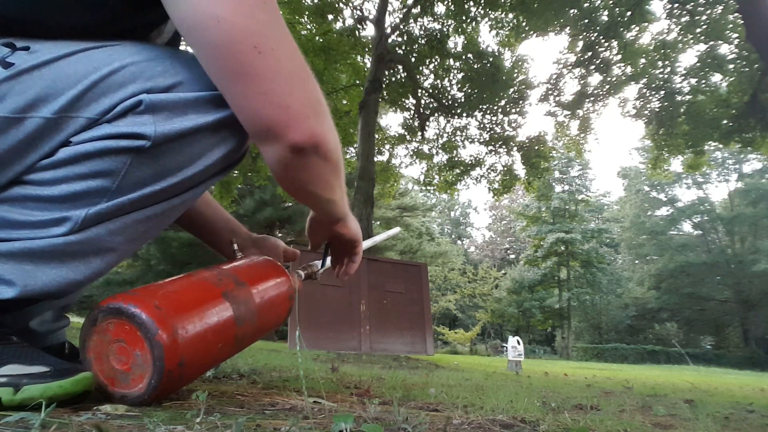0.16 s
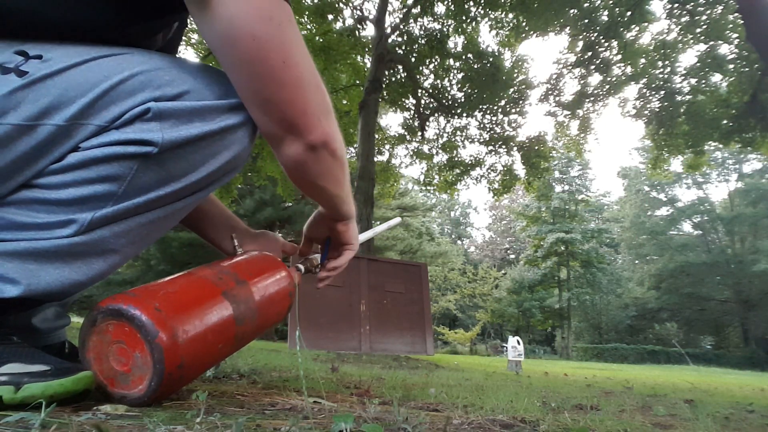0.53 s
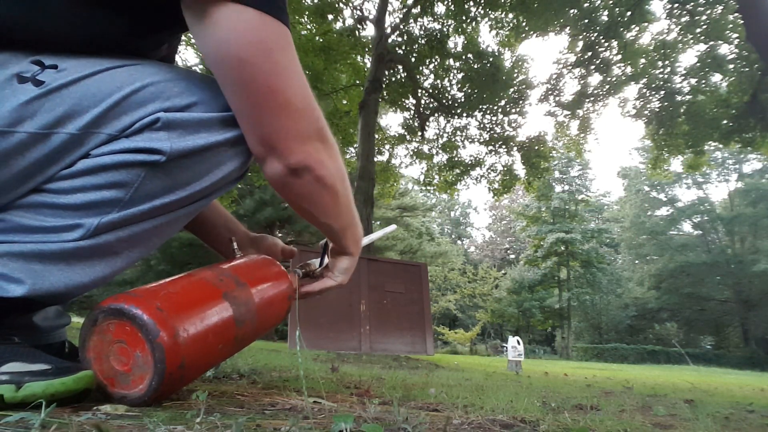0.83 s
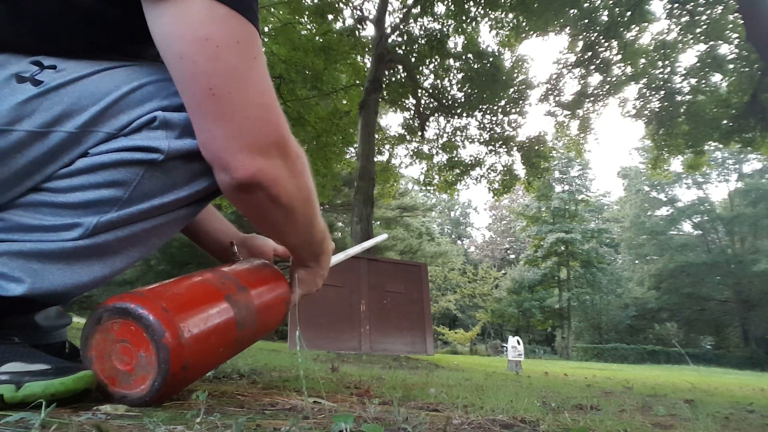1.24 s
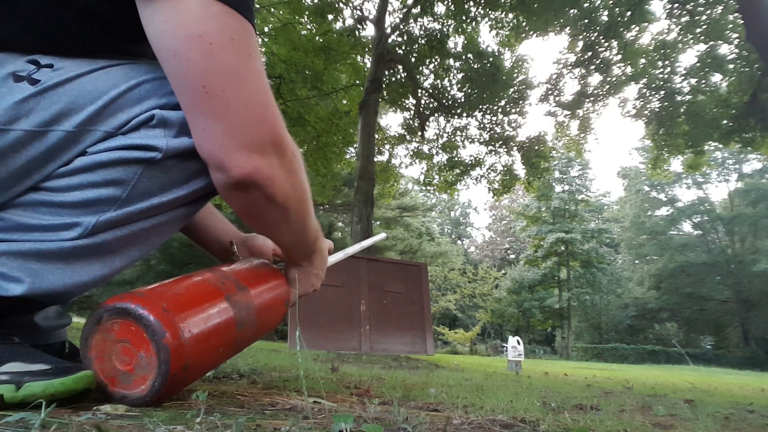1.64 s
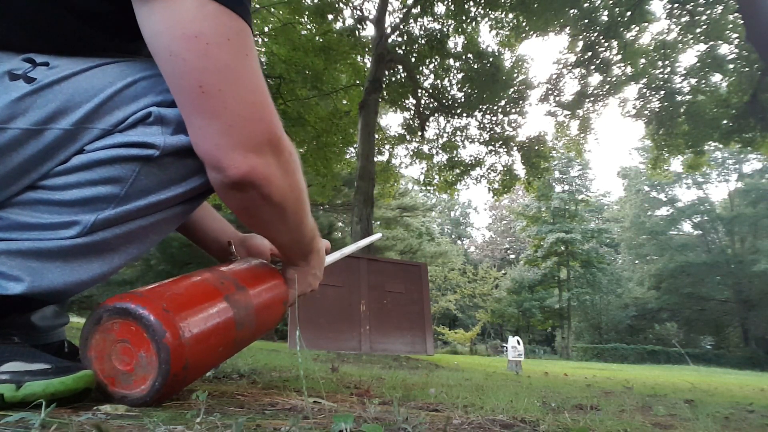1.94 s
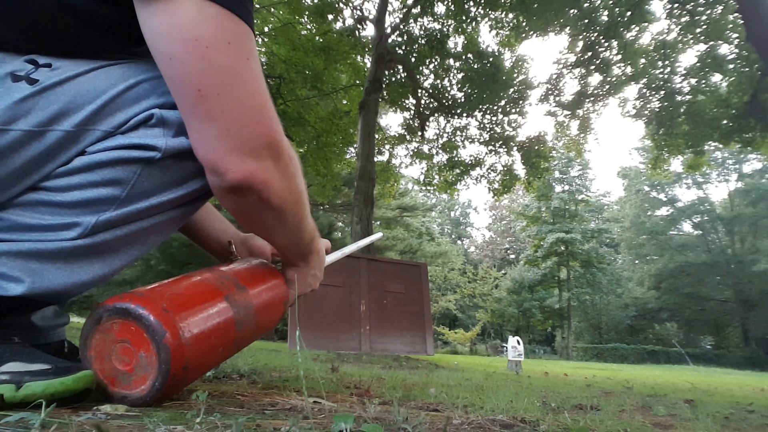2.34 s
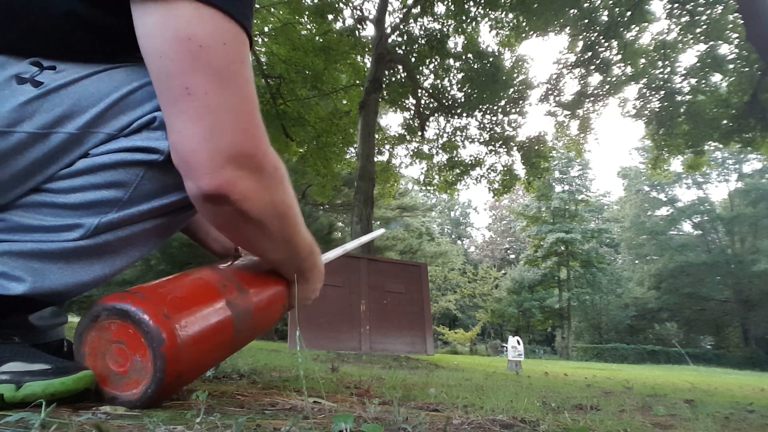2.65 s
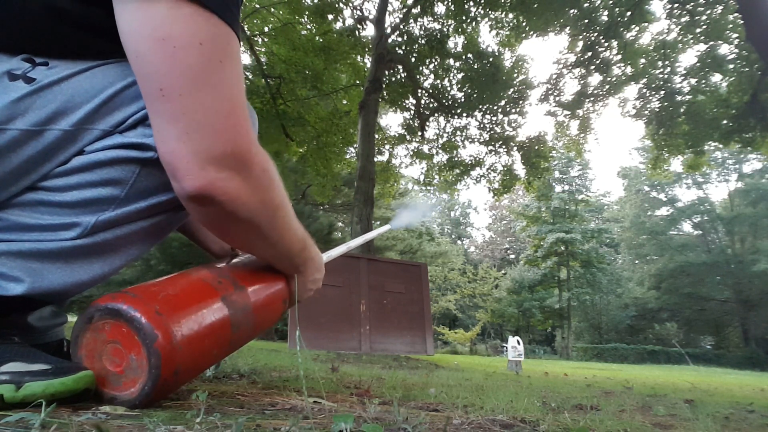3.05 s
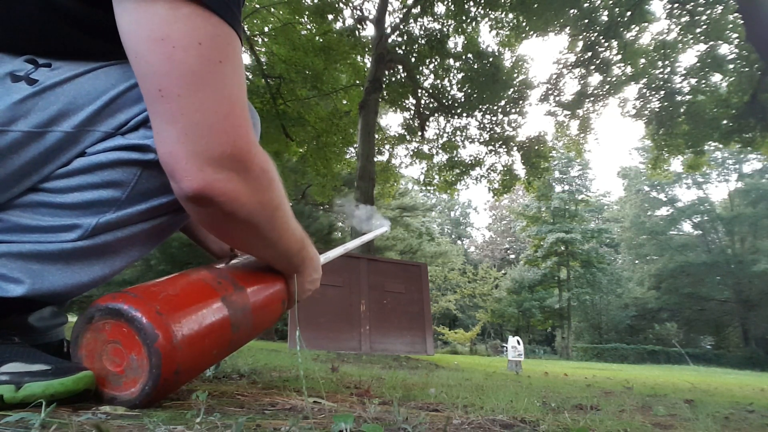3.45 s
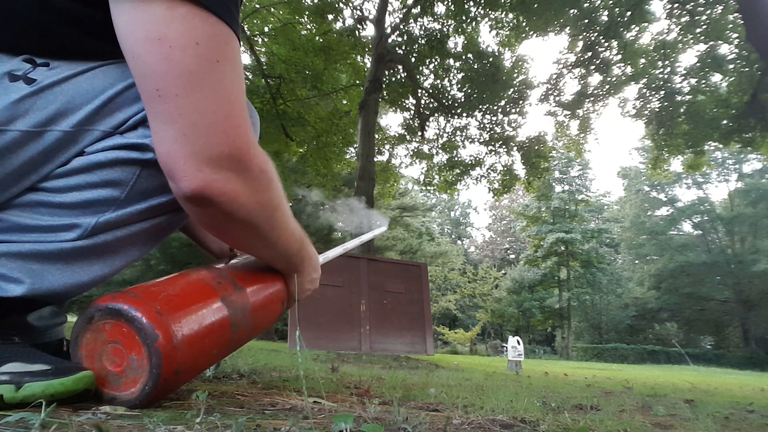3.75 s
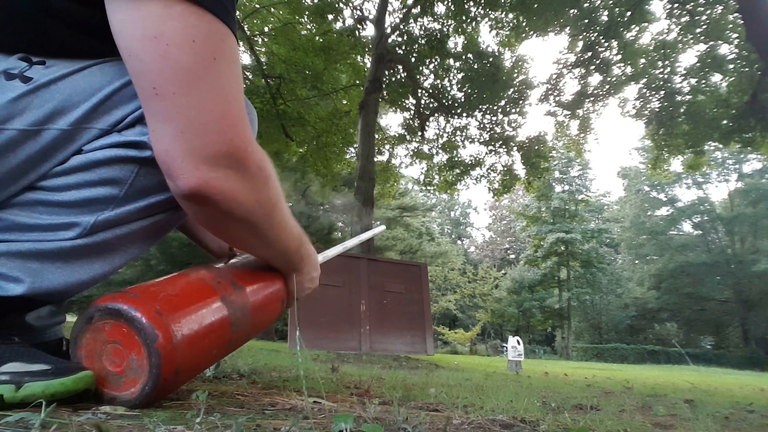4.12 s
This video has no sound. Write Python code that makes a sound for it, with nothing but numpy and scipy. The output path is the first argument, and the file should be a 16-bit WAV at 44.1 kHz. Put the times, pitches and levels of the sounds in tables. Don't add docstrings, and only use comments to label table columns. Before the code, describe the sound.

Outdoors on a lawn, faint traffic hum, hiss and chirping crickets lie under small taps, rubs and scrapes of hands on a metal tank. A valve clicks, a very brief hiss leaks, then a deafening crack bursts close to the stereo microphone, overloading it. A bright roaring, whistling air jet drains within about half a second, leaving a low roll, tree echoes and slowly returning crickets.

```python
import sys
import numpy as np
from scipy import signal
from scipy.io import wavfile
from scipy.ndimage import uniform_filter1d

SR = 44100
rng = np.random.default_rng(int(sys.argv[2]) if len(sys.argv) > 2 else 0)


def ratio_of_db(decibels):
    return 10 ** (np.asarray(decibels, float) / 20)


def file_out(sig):
    cols = np.atleast_2d(sig).T
    lim = np.clip(cols, -1, 1)
    pcm = np.round(lim * 32767).astype(np.int16)
    wavfile.write(sys.argv[1], SR, pcm)


N = 189008

# (frequency [Hz], level per Hz [dB])
AIR_COLOUR = [(25, -20), (60, -10), (86, -1), (118, 1), (184, -7), (320, -14), (1100, -25.5), (2120, -32),
              (5100, -48.5), (6000, -44), (8400, -48), (9970, -56), (14800, -48), (16000, -48)]
# (frequency [Hz], likeness [-1..1])
AIR_LIKENESS = [(40, .85), (130, .85), (290, .7), (640, .16), (1410, -.15), (3100, .04), (15000, 0)]
# (frequency [Hz], left minus right [dB])
AIR_BALANCE = [(60, -0.5), (180, 0.5), (550, 0), (1650, 1.5), (4970, -1.0), (15000, 0)]
# (frequency [Hz], width [Hz], level [dB])
MACHINE_HUM = (1185, 10, -70)
# (frequency [Hz], width [Hz], level [dB])
CHORUS = [(6540, 200, -73), (6800, 260, -73), (7700, 500, -79)]
LOW_CRICKET = (6310, 0, -69.3, 42, .155, 1)
LOW_CHIRPS = [.11, .395, .69, .99, 1.31, 1.62, 1.9, 2.215, 2.51, 3.57, 3.87, 4.17]
HIGH_CRICKET = (6860, 0, -68.8, 39, .23, -1)
HIGH_CHIRPS = [.12, .46, .78, 1.07, 1.36, 1.7, 2.05, 2.36, 3.45, 3.7, 4.04]
FIELD_CRICKET = (4200, 450, -79, 15, .48, -2)
FIELD_CHIRPS = [-.27, .53, 1.2, 1.77, 3.2, 3.9]
# (time [s], level [dB], frequency [Hz], width [Hz], length [s])
RUSTLES = [
    (.09, -71, 4600, 150, .04),
    (.785, -62, 3000, 6000, .022),
    (.8, -62, 1100, 1100, .4),
    (.83, -66, 3800, 300, .02),
    (1.04, -65, 5500, 7000, .1),
    (1.24, -64.5, 3600, 500, .13),
    (1.62, -70, 4000, 900, .02),
    (2.288, -60, 4000, 1600, .014),
    (2.297, -65, 3750, 500, .05),
    (2.55, -71, 4200, 900, .02),
]
# (frequency [Hz], time to fall 60 dB [s])
TREE_FADE = [(300, .9), (1500, 1.1), (3500, 1.6), (6000, .85), (9000, .9), (11000, .9), (15000, .7)]
# (frequency [Hz], width [Hz], level [dB], time to fall 60 dB [s])
RUMBLE = (330, 480, -30.5, .95)
# (time [s], peak [dB], length [ms], port ring [dB])
SHOCKS = [
    (2.64873, 0, .28, -12),
    (2.6495, -30, .3, -10),
    (2.6503, -22, .3, -6),
    (2.6509, -11, .22, -22),
    (2.6519, -14, .25, -7),
    (2.6527, -22, .3, -11),
    (2.6560, -22, .3, -22),
    (2.6890, -19, .6, -30),
]
# (frequency [Hz], level [dB], time to fall 60 dB [s])
THUMP = [
    (95, -26, .06),
    (150, -27, .2),
    (360, -15, .045),
]
# (start [s], end [s], first pitch [Hz], last pitch [Hz], level [dB])
RUN_UP = (2.6450, 2.6482, 700, 2600, -20)
# (frequency [Hz], level per Hz [dB])
FULL_JET = [(60, -48), (110, -22), (300, -20), (570, -17), (800, -10), (1100, -14), (1950, -13.5),
            (3500, -18), (5500, -11), (7800, -4), (10500, -12), (16000, -12)]
LOW_JET = [(60, -60), (100, -34), (330, -33), (500, -26), (800, -11), (1600, -5.5), (2900, -6),
           (4400, -3.5), (6000, -2), (8800, -3), (10500, -11), (16000, -20)]
EMPTY_JET = [(180, -42.5), (400, -20), (700, -4), (1000, 1), (1350, -11), (1700, 1), (2200, -5), (3600, -3),
             (4400, -9), (8800, -17), (16000, -36)]
# (frequency [Hz], likeness [-1..1], left minus right [dB])
JET_PORTS = [(300, .72, 1.5), (1700, .88, 1), (2500, .75, 0), (3300, .05, -3), (4000, -.05, -2),
             (5200, .53, 2.5), (7500, .86, 0.5), (9300, .6, 5), (10000, -.2, -2.5), (11200, -.6, -3),
             (12300, -.1, 3.5), (13500, .2, 7.5), (15500, .55, 1)]
# (time [s], jet level [dB], drained [0 full, 1 low, 2 empty])
TANK = [
    (2.7, -13.3, .05),
    (2.8, -14.8, .15),
    (2.93, -16.7, .7),
    (3.06, -20.6, .95),
    (3.12, -29, 1.25),
    (3.2, -44, 1.8),
    (3.25, -59, 1.9),
]
# (start [s], end [s], first pitch [Hz], last pitch [Hz], share of the jet [dB])
WHISTLES = [
    (2.652, 2.895, 8050, 7450, -5),
    (2.97, 3.095, 6200, 5800, -10.5),
]
# (frequency [Hz], width [Hz], level [dB])
BARREL = [(730, 45, -8), (930, 45, -6), (1110, 45, -8), (1690, 45, -3), (1900, 50, -12)]
# (frequency [Hz], level [dB])
BODY = [(3800, 0), (4100, -3), (4450, 1), (4800, 0), (8300, 0), (9050, 6), (9350, 2), (9700, -2),
        (10600, 0), (11800, 1), (12350, 5), (12800, 0), (14800, 0), (15500, 4)]

SHOT_S = 2.6487
TIME = np.arange(N) / SR


def evened(x):
    return x / np.sqrt(np.mean(x ** 2) + 1e-20)


def read(points, hz, axis=1):
    table = np.array(points)
    return np.interp(np.log(hz + 1), np.log(table[:, 0] + 1), table[:, axis])


def over_time(rows):
    s, *columns = np.transpose(rows)
    return [np.interp(TIME, s, column) for column in columns]


def resonate(x, hz, width):
    r = np.exp(-np.pi * width / SR)
    if np.ndim(hz) == 0:
        pole = r * np.exp(2j * np.pi * hz / SR)
        return 2 * signal.lfilter([1 - r], [1, -pole], x + 1e-18).real
    turn = np.exp(2j * np.pi * np.cumsum(hz) / SR)
    return 2 * (turn * signal.lfilter([1 - r], [1, -r], x / turn + 1e-18)).real


def resonate_twice(x, hz, width):
    return evened(resonate(resonate(x, hz, width), hz, width))


def noise(colour, likeness, balance, size, patch_db):
    hz = np.fft.rfftfreq(size, 1 / SR)
    a, b, c, d, patches = rng.standard_normal((4 * N // size + 5, len(hz), 5)).T
    patches = uniform_filter1d(patches, size=10, axis=0)
    patches = evened(uniform_filter1d(patches, size=10, axis=1))
    alike = np.clip(likeness(hz), -1, 1)[:, None]
    side = ratio_of_db(balance(hz)[:, None] / 2)
    left = a + 1j * b
    right = alike * left + np.sqrt(1 - alike ** 2) * (c + 1j * d)
    spectra = np.array([left * side, right / side])
    spectra *= ratio_of_db(read(colour, hz)[:, None] + patch_db * patches)
    return evened(signal.istft(spectra, nperseg=size, noverlap=size - size // 4)[1][:, :N])


def air():
    out = ratio_of_db(-42) * noise(AIR_COLOUR, lambda hz: read(AIR_LIKENESS, hz), lambda hz: read(AIR_BALANCE, hz),
                           size=2048, patch_db=0.6263)
    for hz, width, db in [MACHINE_HUM] + CHORUS:
        out += ratio_of_db(db) * resonate_twice(rng.standard_normal((2, N)), hz, width)
    return out


def cricket(insect, starts):
    hz, rise_hz, db, rate, length, side_db = insect
    stroke, gate, along = np.zeros(N), np.zeros(N), np.zeros(N)
    for s in starts:
        on = (TIME >= s) & (TIME < s + length)
        stroke += on * ((TIME - s) * rate % 1)
        along += on * (TIME - s) / length
        gate += on
    pitch = hz + 130 * (stroke - .5) + rise_hz * np.tanh(1.8 * along)
    swell = np.sin(np.pi * along ** (1 + rise_hz / 800)) ** (.35 + rise_hz / 900)
    strokes = .7 + np.sin(np.pi * np.minimum(stroke / .85, 1))
    blurred = resonate(resonate(rng.standard_normal((2, N)), pitch, 110), pitch, 110)
    heard = gate * swell * strokes * blurred
    heard /= np.sqrt(np.mean(heard[:, gate > 0] ** 2, axis=1, keepdims=True))
    return ratio_of_db(db) * ratio_of_db(side_db / 2 * np.array([[1], [-1]])) * heard


def hands():
    out = np.zeros((2, N))
    grit = rng.standard_normal((2, N))
    grit = grit * ratio_of_db(3.0 * evened(uniform_filter1d(rng.standard_normal(N), size=120)))
    for s, db, hz, width, length in RUSTLES:
        u = np.clip((TIME - s) / length, 0, 20)
        out += ratio_of_db(db) * resonate_twice(grit, hz, width) * np.tanh(8 * u) * np.exp(-u ** 2)
    return out


def ducking():
    lawn_db, duck_db = 1.4, -10.5
    fall_s, release_s, recover_s = .07, 3.25, .15
    fallen = 1 - np.exp(-np.maximum(TIME - SHOT_S, 0) / fall_s)
    recovery = 1 + np.maximum(TIME - release_s, 0) / recover_s
    return ratio_of_db(lawn_db + duck_db * fallen / recovery)


def trees(x):
    taps = np.zeros((2, SR))
    at = np.arange(900, SR - 20, 20) + rng.integers(0, 20, (2, (SR - 901) // 20))
    np.put_along_axis(taps, at, rng.choice([-1., 1.], at.shape), 1)
    hz, t, z = signal.stft(taps, SR, nperseg=256)
    fade = ratio_of_db(-60 * t / read(TREE_FADE, hz)[:, None])
    tail = signal.istft(z * fade, SR, nperseg=256)[1]
    return signal.fftconvolve(x, tail / np.linalg.norm(tail[0]), axes=1)[:, :N]


def rumble():
    hz, width, db, t60 = RUMBLE
    since = TIME - SHOCKS[0][0]
    shared, separate = rng.standard_normal(N), rng.standard_normal((2, N))
    roll = resonate_twice(shared + .7 * separate, hz, width)
    return (since > 0) * ratio_of_db(db - 60 * np.maximum(since, 0) / t60) * roll


def plug_run_up():
    start, end, low_hz, high_hz, db = RUN_UP
    along = np.clip((TIME - start) / (end - start), 0, 1)
    hz = low_hz + (high_hz - low_hz) * along
    return ratio_of_db(db) * along * (along < 1) * np.sin(2 * np.pi * np.cumsum(hz) / SR)


def shock():
    ring_hz, ring_width_hz = 7200, 900
    push, kicks = np.zeros(N), np.zeros(N)
    for s, db, ms, ring_db in SHOCKS:
        u = np.clip((TIME - s) / (ms / 1000), -5, 40)
        front = .5 + .5 * np.tanh(u / .08)
        push += ratio_of_db(db) * front * np.tanh(6.0 * (1 - u)) * np.exp(-.12 * u ** 3 * (u > 0))
        kick = np.exp(-((TIME - s) / .0004) ** 2)
        kicks += ratio_of_db(ring_db) * kick * np.sin(2 * np.pi * ring_hz * TIME)
    since = np.maximum(TIME - SHOCKS[0][0], 0)
    for hz, db, t60 in THUMP:
        push += ratio_of_db(db - 60 * since / t60) * np.sin(2 * np.pi * hz * since)
    port_ring = 1.3 * resonate(kicks, ring_hz, ring_width_hz) * ratio_of_db(np.array([[1.5], [-1.5]]))
    return push + plug_run_up() + port_ring


def tank_pressure():
    valve_s, leak_db, leak_rise_s, leak_drained = 2.619, -38, .012, 1.5
    burst_db, burst_s = -13.5, .0058
    lull_db, refill_s, lull_drained = -7, .006, .25
    level_db, drained = over_time(TANK)
    refill = np.exp(-np.maximum(TIME - SHOT_S - burst_s, 0) / refill_s)
    level_db = np.where(TIME < SHOT_S + burst_s, burst_db, level_db + lull_db * refill)
    leak = ratio_of_db(leak_db) * np.clip((TIME - valve_s) / leak_rise_s, 0, 1) ** 2
    level = np.where(TIME < SHOT_S, leak, ratio_of_db(level_db) * (TIME < TANK[-1][0]))
    drained = np.where(TIME < SHOT_S, leak_drained, drained + lull_drained * refill)
    return uniform_filter1d(level, size=30), drained


def crackle(drained):
    kicks_per_s, kick_db, fade_s = 350, -4, .0009
    chance, size = rng.random(N), np.minimum(rng.exponential(1, N), 2)
    hits = size * (chance < kicks_per_s / SR)
    kicks = signal.lfilter([1], [1, -np.exp(-1 / (fade_s * SR))], hits)
    return evened(1 + ratio_of_db(kick_db) * kicks * np.clip(1 - drained, 0, 1))


def whistle(flow):
    width_hz, edge_s = 1050, .012
    out = 0
    wander = 1 + .012 * evened(uniform_filter1d(rng.standard_normal(N), size=500))
    for start, end, from_hz, to_hz, db in WHISTLES:
        along = np.clip((TIME - start) / (end - start), 0, 1)
        hz = wander * (from_hz + (to_hz - from_hz) * along ** 2)
        on = (np.tanh((TIME - start) / edge_s) - np.tanh((TIME - end) / edge_s)) / 2
        out = out + ratio_of_db(db) * on * resonate_twice(flow, hz, width_hz)
    return out


def barrel_ring(flow, drained):
    sings_from = .9
    pipe = sum(ratio_of_db(db) * evened(resonate(flow, hz, width)) for hz, width, db in BARREL)
    return ratio_of_db(-10) * np.clip(drained - sings_from, 0, 1) * (TIME > SHOT_S) * pipe


def microphone_body(x):
    hz = np.linspace(0, SR / 2, 257)
    taps = signal.firwin2(255, hz, ratio_of_db(read(BODY, hz)), fs=SR)
    return signal.oaconvolve(x, taps[None], "same")


def jet():
    level, drained = tank_pressure()
    full, low, empty = (noise(colour, lambda hz: read(JET_PORTS, hz), lambda hz: read(JET_PORTS, hz, axis=2),
                              size=512, patch_db=1.5) for colour in (FULL_JET, LOW_JET, EMPTY_JET))
    shares = [np.sqrt(np.clip(1 - abs(drained - k), 0, 1)) for k in range(3)]
    roar = shares[0] * full + shares[1] * low + shares[2] * empty
    roar = roar + barrel_ring(empty, drained)
    eddies_db = .8 * evened(uniform_filter1d(rng.standard_normal(N), size=70))
    strength = ratio_of_db(-2) * level * ratio_of_db(eddies_db) * crackle(drained)
    return microphone_body(strength * (roar + whistle(low)))


def scene():
    blast = jet() + shock() + rumble()
    insects = cricket(LOW_CRICKET, LOW_CHIRPS) + cricket(HIGH_CRICKET, HIGH_CHIRPS)
    insects = insects + cricket(FIELD_CRICKET, FIELD_CHIRPS)
    lawn = air() + insects + hands()
    return blast + ratio_of_db(-25) * trees(blast) + ducking() * lawn


def roll_off(x):
    return signal.sosfilt(signal.butter(12, 16630, fs=SR, output="sos"), x)


def record(dry):
    bass_cut_hz, treble_cut_hz = 42, 15850
    thinned = signal.lfilter(*signal.butter(2, bass_cut_hz, "high", fs=SR), dry)
    overloaded = np.clip(thinned, -.86, .86)
    edge = signal.firwin(1023, treble_cut_hz, window=("kaiser", 9), fs=SR)
    return roll_off(signal.oaconvolve(overloaded, edge[None], "same"))


dry = scene()
out = record(dry)
file_out(out)
```